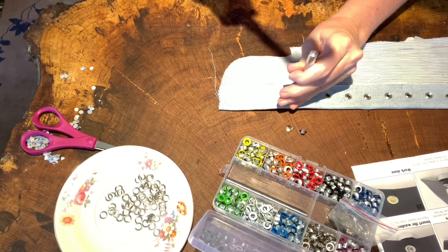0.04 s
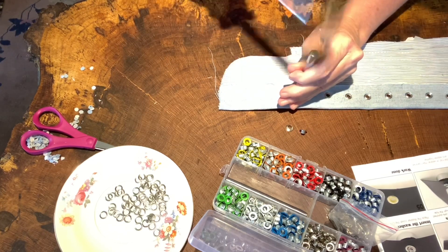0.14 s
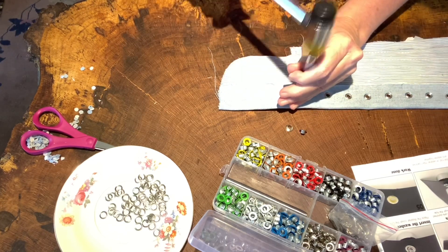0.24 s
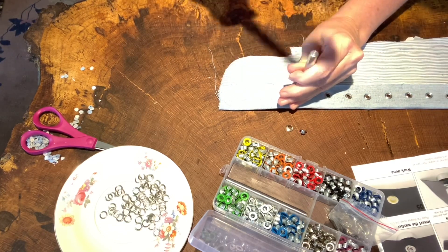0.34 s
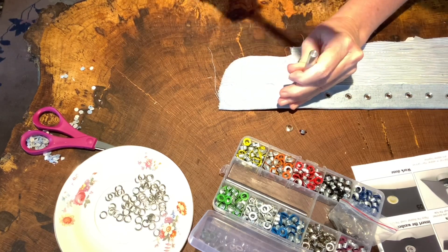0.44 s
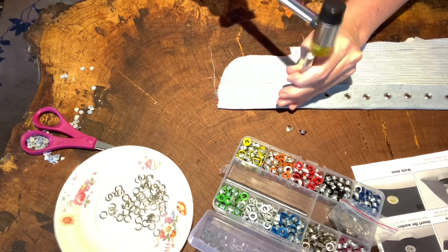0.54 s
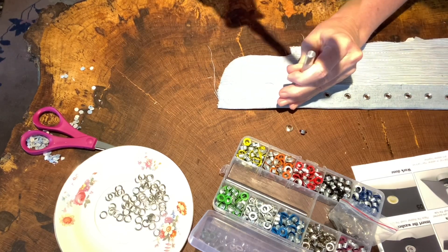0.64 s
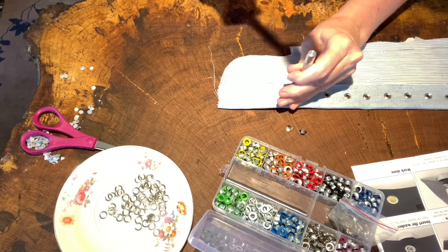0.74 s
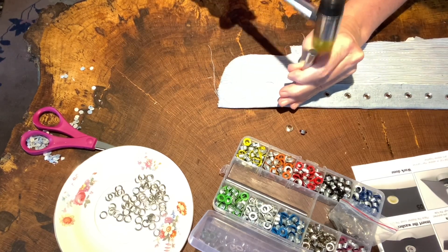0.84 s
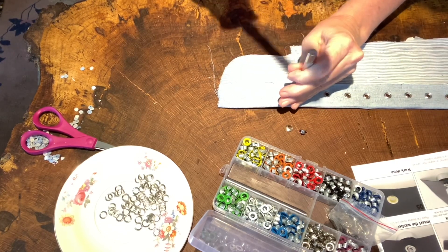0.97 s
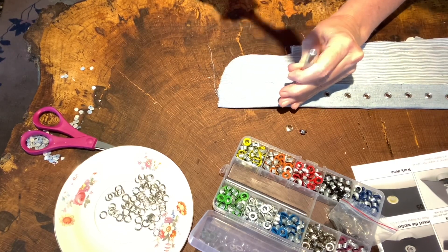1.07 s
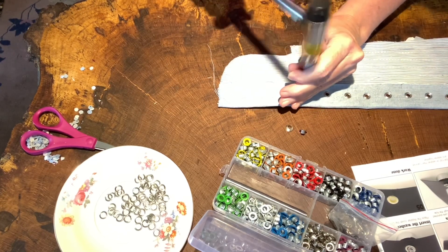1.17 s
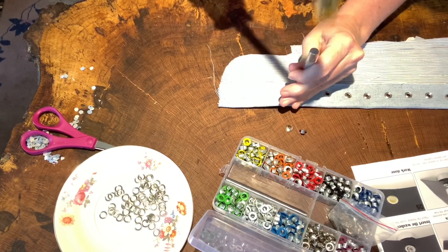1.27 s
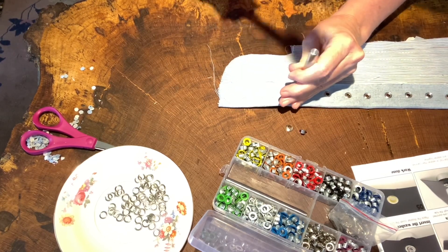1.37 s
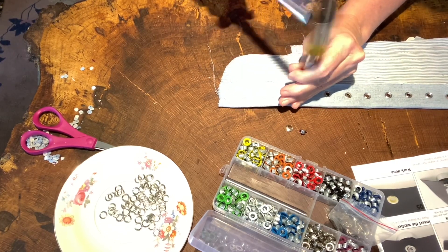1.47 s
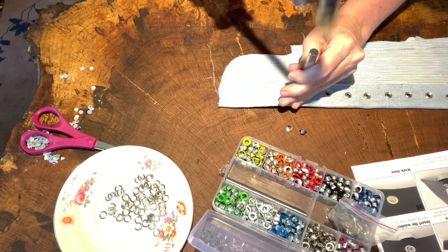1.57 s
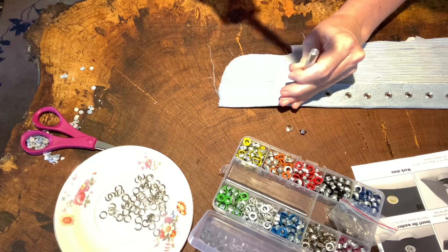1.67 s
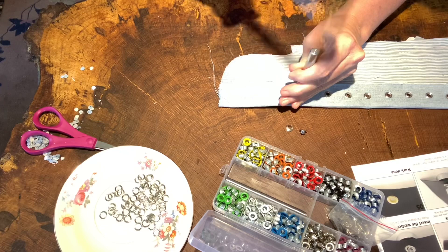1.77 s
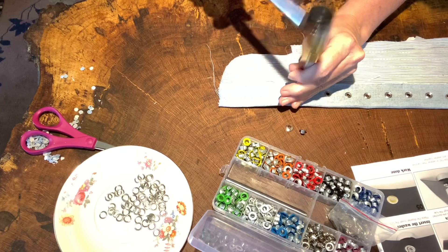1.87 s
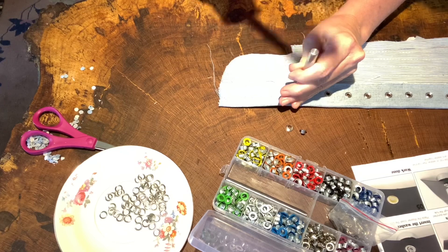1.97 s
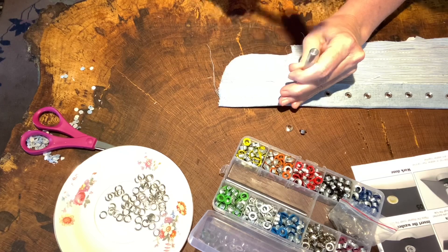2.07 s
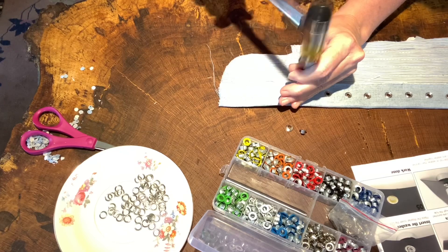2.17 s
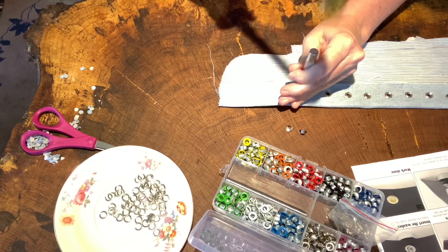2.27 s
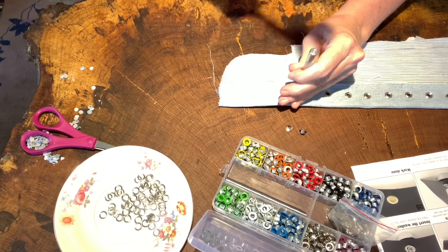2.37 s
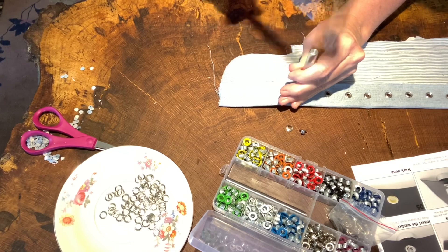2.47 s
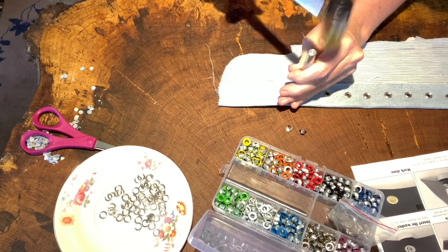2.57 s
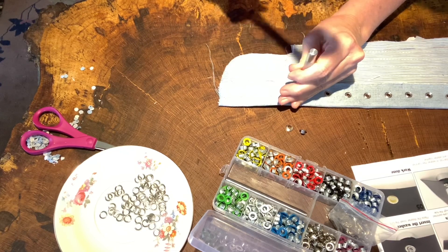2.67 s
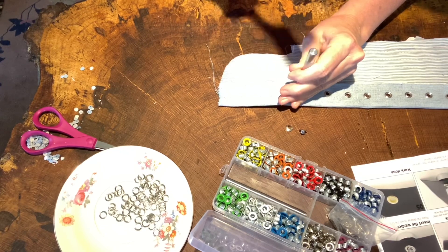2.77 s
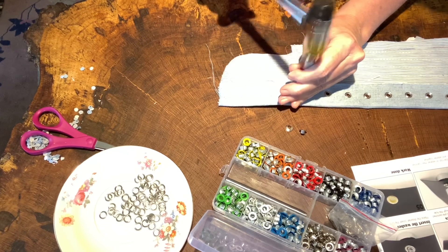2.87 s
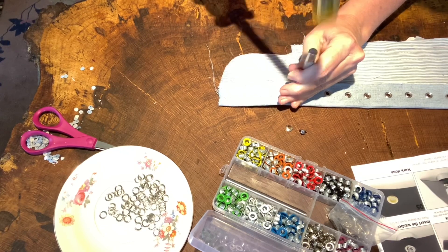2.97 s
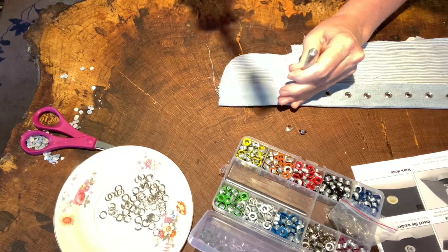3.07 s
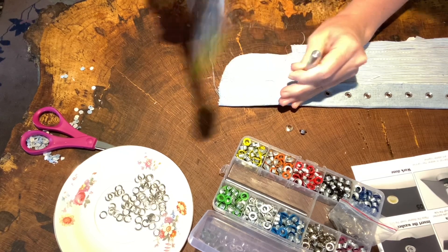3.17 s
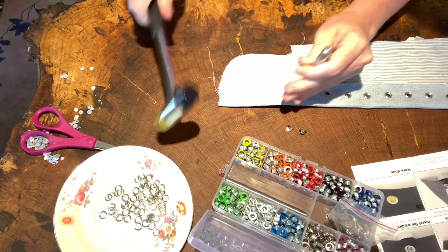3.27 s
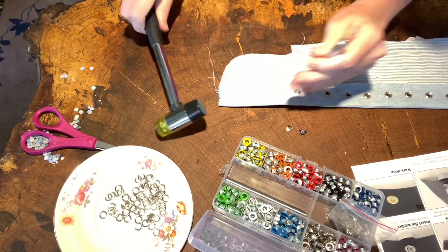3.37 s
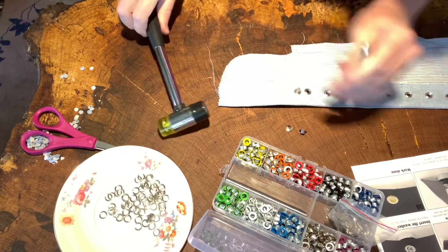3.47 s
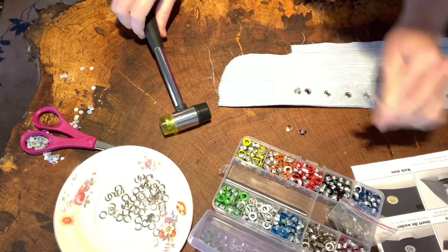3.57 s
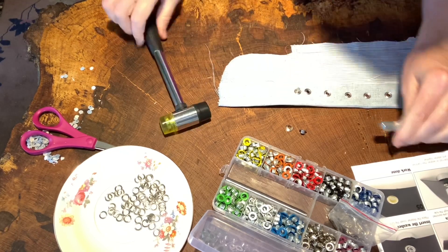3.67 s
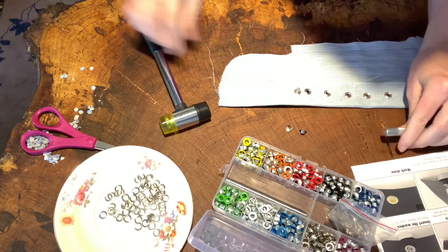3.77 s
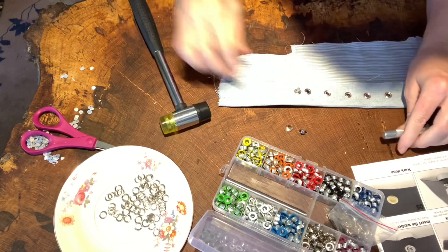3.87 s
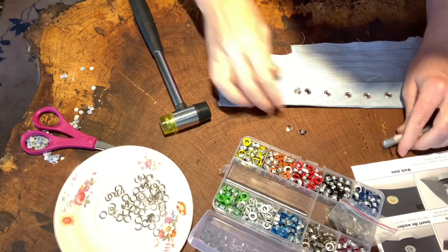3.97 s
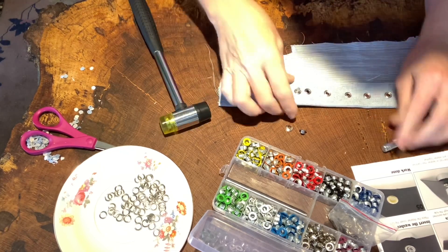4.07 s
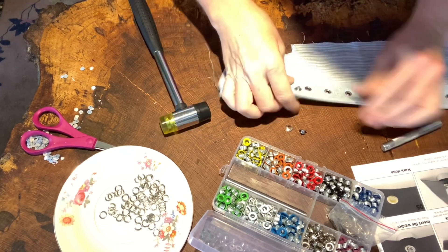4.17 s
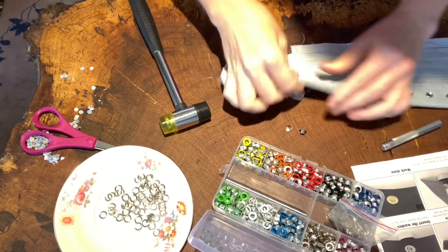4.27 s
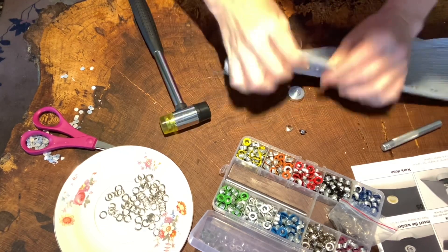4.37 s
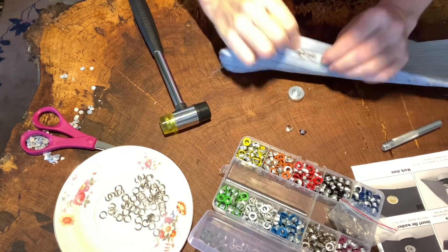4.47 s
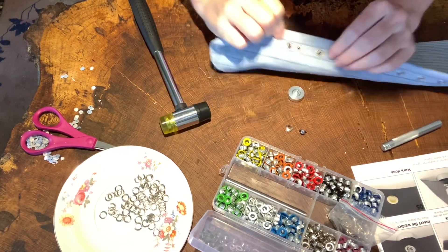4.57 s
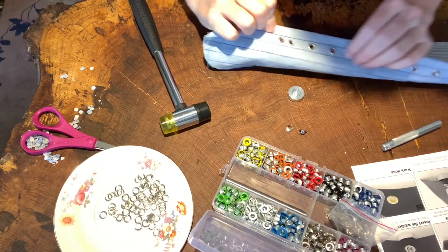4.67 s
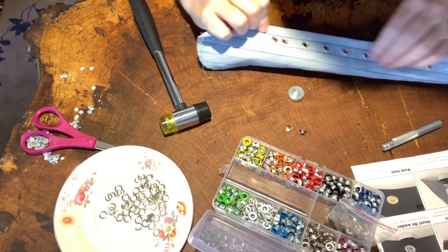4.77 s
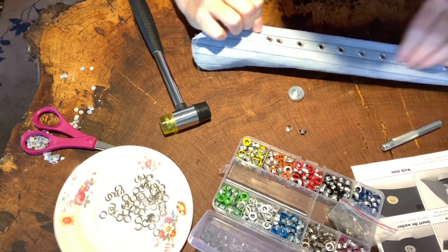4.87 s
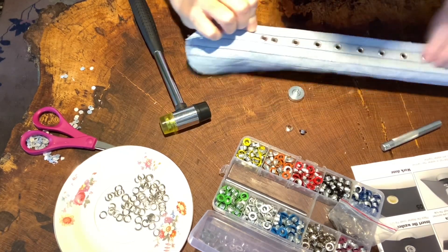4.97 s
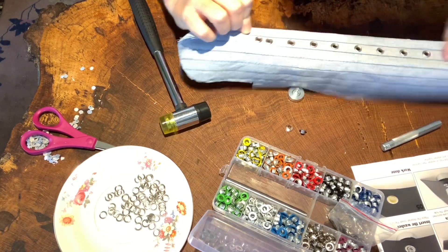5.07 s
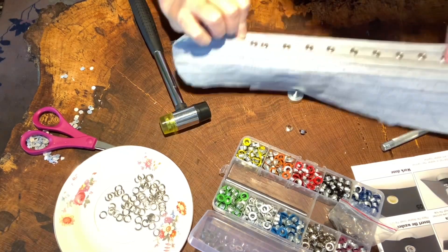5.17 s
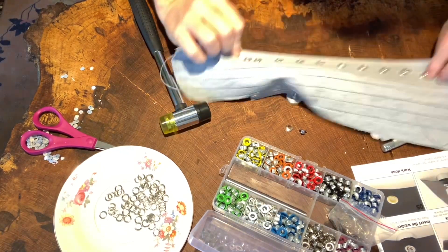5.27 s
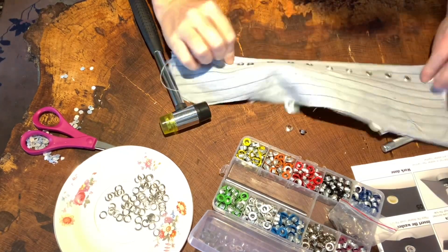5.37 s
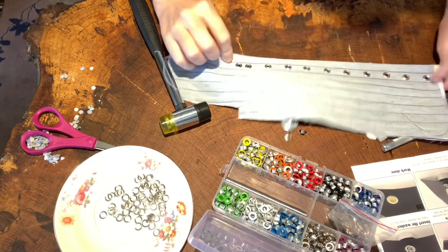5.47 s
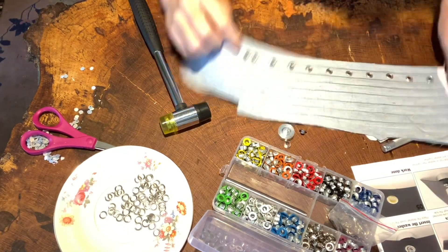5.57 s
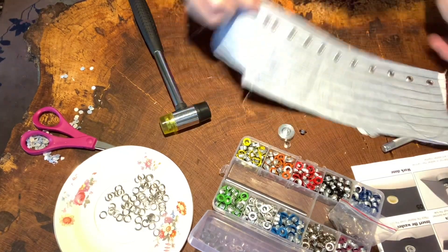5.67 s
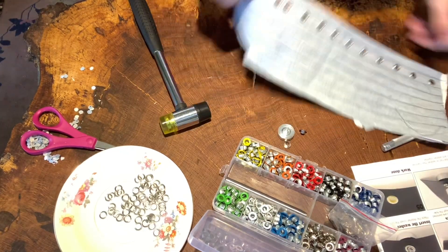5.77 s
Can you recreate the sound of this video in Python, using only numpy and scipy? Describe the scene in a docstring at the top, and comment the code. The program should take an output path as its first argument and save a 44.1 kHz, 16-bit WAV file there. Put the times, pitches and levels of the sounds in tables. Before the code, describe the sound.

A small mallet strikes a steel eyelet punch nine times on a wooden table, then tools are set down with knocks and a clink.

```python
"""A mallet drives a steel eyelet punch nine times through cloth into a thick wooden table.
Small live room, one microphone, near enough to hear each knock ahead of the room's answer.
The punch scrapes out of the eyelet and touches the wood; the mallet is laid down, head then handle.
The punch drops and rings on its bending modes, the little anvil clicks free, and the cloth strip
is lifted away with a faint rustle. A quiet room hum lies under it all."""
import sys
import numpy as np
from scipy import signal
from scipy.fft import rfft, irfft, next_fast_len
from scipy.io import wavfile

SR = 44100
rng = np.random.default_rng(int(sys.argv[2]) if len(sys.argv) > 2 else 0)


def digitize_waveform(pressure):
    """Quantize a signal to 16-bit integers and store it at the path in sys.argv[1].

    Rows of a 2-D input are taken as channels; values are limited to [-1, 1].
    """
    field = np.atleast_2d(pressure).T
    bounded = np.clip(field, -1, 1)
    quanta = np.round(bounded * 32767).astype(np.int16)
    wavfile.write(sys.argv[1], SR, quanta)


N = 257103
SPAN = 32768  # samples in one impact and its tail
T = np.arange(SPAN) / SR
HZ = np.fft.rfftfreq(SPAN, 1 / SR)

# room tone: freq_hz, level_db
ROOM_TONE = [(25, -17.5), (50, -8), (90, -8.5), (150, 2.5), (230, -9.5), (550, -10.5), (1000, -14.5),
             (2100, -19), (5400, -23), (7000, -22), (14400, -30), (16000, -26.5)]
# decay of the room: freq_hz, t60_s
ROOM_DECAY = [(100, 0.83), (300, .42), (550, 0.28), (1000, .31), (3000, 0.27), (7500, .255), (14000, .21)]
# mallet blows: start_s, level_db, slant_db, chink_db, edge_db
BLOWS = [(0.1185, -1.5, -4, 3, 3.5), (0.4574, 0, -5, -0.5, -1.5), (0.782, 0, 2.5, -4.5, -2.5),
         (1.1195, -0.5, 1.5, 1.5, 2.5), (1.436, 0.5, -4.5, 0.5, -1.5), (1.7597, -0.5, -4, -3, 3.5),
         (2.1057, 0.5, -4, 3, 1), (2.458, 0, -1, -2.5, -1.5), (2.8132, -1, -0.5, 3.5, 7)]
# a blow's knock, straight to the microphone: freq_hz, level_db
KNOCK_SPECTRUM = [(25, 0), (130, 11), (450, 24), (900, 25.5), (1250, 26.5), (1800, 17.5), (2400, 14),
                  (3000, 18), (4400, 8), (7200, 12), (10000, 2), (15000, 2)]
# low modes of table and room: pitch_hz, level_db, t60_s
BOOM_MODES = [(45.1, -35.5, 0.33), (61.2, -40.0, 0.36), (96.9, -34.0, 0.49), (130.5, -23.0, 0.31),
              (185.7, -21.0, 0.34), (199.9, -20.0, 0.35), (253.7, -24.0, 0.46), (277.2, -25.0, 0.34),
              (356.0, -23.5, 0.31), (370.8, -24.0, 0.28), (440.1, -22.0, 0.2), (459.6, -19.5, 0.24),
              (500.0, -18.5, 0.32), (528.9, -24.0, 0.3), (551.8, -20.0, 0.27), (624.5, -19.0, 0.28),
              (649.4, -22.5, 0.25), (736.8, -18.5, 0.23), (765.1, -25.0, 0.24), (788.0, -19.5, 0.25),
              (845.0, -25.5, 0.24), (872.0, -22.0, 0.21), (1026.9, -29.0, 0.26), (1066.6, -30.0, 0.25),
              (1139.9, -24.5, 0.26), (1163.5, -25.0, 0.25), (1255.7, -26.0, 0.22), (1291.3, -30.0, 0.24),
              (1319.6, -24.5, 0.19), (1416.5, -24.5, 0.19)]
# the room's diffuse answer to a blow: freq_hz, level_db
WASH_SPECTRUM = [(25, -17), (100, 13), (300, 25), (650, 25.5), (900, 19), (1100, 18), (1500, 20),
                 (1850, 16), (2100, 14.5), (2500, 11), (3200, 13.5), (4400, 7.5), (6000, 10.5), (7400, 12),
                 (10000, 3), (15000, -2.5)]
# a slanting blow shifts weight between the punch's resonances: freq_hz, slant_share
SLANT_SHARES = [(1500, 0), (2050, 1), (3100, -.8), (4100, .9), (6000, 0)]
# steel scraping in the eyelet: freq_hz, level_db
SCRAPE_SPECTRUM = [(200, -20), (2500, -6), (4000, 0), (5200, -1), (6400, 6), (8000, -12), (11000, -24),
                   (16000, -32.5)]
# the punch meets the table: start_s, clack_db, ring_db
PUNCH_DROPS = [(3.2135, -25.5, -48), (3.965, -13, -21), (3.9881, 2, 0), (4.041, -2.5, -45.5),
               (4.076, -13.5, -50)]
# its clack on the wood: freq_hz, level_db
CLACK_SPECTRUM = [(30, -30.5), (200, 3), (500, 5.5), (1000, 2), (1400, 4.5), (1750, 2), (2380, 5.5),
                  (2900, -2.5), (3850, 2.5), (4500, -2), (5150, -2), (8300, -11), (11000, -17.5),
                  (15000, -28)]
# its bending modes: pitch_hz, level_db, t60_s
PUNCH_MODES = [(6341, -13, .4), (2363, -35, .24), (3833, -40, .25), (5152, -43, .25)]
# the mallet head touches the table: start_s, level_db, tilt_db_per_octave
HEAD_TAPS = [(3.389, -21.5, -5.5), (3.5335, -1.5, -1.5)]
# the head's knock: freq_hz, level_db
HEAD_SPECTRUM = [(30, -37), (200, -0.5), (450, 0), (610, 11.5), (730, -1), (870, 9), (1080, -2), (1340, 8),
                 (1650, -7.5), (2300, -0.5), (4000, -9), (8000, -17), (15000, -25.5)]
# the handle lands and bounces: start_s, level_db, tilt_db_per_octave
HANDLE_TAPS = [(3.651, 3, -2.5), (3.6955, -3, -3.5), (3.7225, -12, -7)]
# the handle's knock: freq_hz, level_db
HANDLE_SPECTRUM = [(30, -15.5), (200, -2.5), (330, -1.5), (430, 10.5), (560, 6), (850, -11), (1160, 2.5),
                   (1900, -8.5), (2400, -6), (3100, -6.5), (4200, -5), (8000, -20.5), (15000, -31.5)]
# anvil and eyelets click: start_s, level_db, tilt_db_per_octave
ANVIL_CLICKS = [(4.2452, 6, -4.5), (4.281, 7, -2.5), (4.303, -12, 2), (5.419, -37.5, 10),
                (5.4665, -28.5, 6.5), (5.545, -20, -9)]
# one such click: freq_hz, level_db
CLICK_SPECTRUM = [(30, -53), (200, -25.5), (800, -21), (1300, -12.5), (2000, -16.5), (3000, -11.5),
                  (4800, -22.5), (7500, -15), (11000, -26), (15000, -29)]
# cloth slides under the fingers: start_s, length_s, level_db
CLOTH_SLIDES = [(4.42, 0.58, -70.5), (5.22, 0.22, -69.5)]
# its rustle: freq_hz, level_db
RUSTLE_SPECTRUM = [(290, -40.5), (500, -16), (868, -8), (1030, -23), (1320, -13), (12900, 3), (16000, -0.5)]
# the lifted strip flaps against the table: start_s, level_db
CLOTH_FLAPS = [(5.035, -70), (5.175, -62.5), (5.53, -65.5), (5.77, -73)]
# one flap: freq_hz, level_db
FLAP_SPECTRUM = [(100, -10.5), (350, -5), (600, 5), (1500, -15), (3000, -26), (16000, -37)]


def amp(db):
    """Decibels to gain."""
    return 10 ** (np.asarray(db) / 20)


def along(points, hz):
    """Read (freq_hz, value) points on a log frequency axis."""
    freqs, values = np.transpose(points)
    return np.interp(np.log(hz + 1), np.log(freqs + 1), values)


def add(track, start_s, sound):
    """Mix a sound into the track."""
    part = track[round(start_s * SR):][:len(sound)]
    part += sound[:len(part)]


def causal(db):
    """Minimum-phase response with these levels: it starts at once and dies away."""
    cepstrum = irfft(db * np.log(10) / 20)
    cepstrum[1:SPAN // 2] *= 2
    cepstrum[SPAN // 2 + 1:] = 0
    return np.exp(rfft(cepstrum))


def waveform(response):
    """The waveform of a frequency response, faded to silence."""
    return irfft(response) * np.clip(8 - 10 * T / T[-1], 0, 1)


def noise(spectrum):
    """Coloured noise of rms 1."""
    gain = amp(along(spectrum, np.fft.rfftfreq(N, 1 / SR)))
    coloured = irfft(rfft(rng.standard_normal(N)) * gain, N)
    return coloured / np.std(coloured)


def room_tone():
    """The steady, quiet hum of the room."""
    return amp(-63) * noise(ROOM_TONE)


def bending(lag_s):
    """Bending waves in wood: treble arrives first; lag_s is the delay at 1 kHz."""
    return np.exp(-4j * np.pi * lag_s * np.sqrt(HZ * 1000))


def rattle(t60_s, from_hz):
    """Above from_hz a contact is no clean pulse: many short modes ring, new ones each time."""
    burst = rng.standard_normal(SPAN) * amp(-60 * T / t60_s)
    blend = np.arctan((HZ / from_hz) ** 2)
    return np.cos(blend) + np.sin(blend) * rfft(burst / np.linalg.norm(burst))


def ring(modes, attack_s):
    """Damped sines that swell in; neighbouring modes swing in opposite senses."""
    sines = [(-1) ** k * amp(db - 60 * T / t60_s) * np.sin(2 * np.pi * hz * T)
             for k, (hz, db, t60_s) in enumerate(modes)]
    return sum(sines) * (1 - np.exp(-T / attack_s))


def room(build_s=.007, gap_s=.0026):
    """The room at the microphone: reflections thicken, then each band dies at its own speed."""
    hz, t, bands = signal.stft(rng.standard_normal(SPAN), SR, nperseg=256)
    swell = 1 - np.exp(-np.maximum(t - gap_s, 0) / build_s)
    fade = swell * amp(-60 * t / along(ROOM_DECAY, hz)[:, None])
    fade /= np.sqrt(np.mean(fade ** 2, axis=1, keepdims=True) * SPAN)  # unit power
    tail = signal.istft(bands * fade, SR, nperseg=256)[1][:SPAN]
    return rfft(tail * (T > gap_s))


def mallet_blows(rim_delay_s=.0024, rim_cutoff_hz=3600, renew_hz=4000):
    """Every blow lands on one spot: wood and room answer much alike while the steel contact varies."""
    # the wave comes back duller from the table's rim
    rim_echo = .9 * np.exp(-2j * np.pi * HZ * rim_delay_s) / (1 + (HZ / rim_cutoff_hz) ** 2)
    knock = causal(along(KNOCK_SPECTRUM, HZ)) * bending(lag_s=.0013) * (1 + rim_echo)
    boom = rfft(ring(BOOM_MODES, attack_s=.017))
    wash, walls = causal(along(WASH_SPECTRUM, HZ)), room()
    renewal = np.arctan(HZ / renew_hz)  # short waves feel the small shifts of hand and tool
    chink_band = along([(4500, 0), (6500, .99), (8500, 1), (10500, 0)], HZ)
    edge_band = along([(8500, .3), (10500, 1)], HZ)
    out = np.zeros(N)
    for start_s, db, slant_db, chink_db, edge_db in BLOWS:
        steel_db = slant_db * along(SLANT_SHARES, HZ) + chink_db * chink_band + edge_db * edge_band
        direct = knock * rattle(t60_s=.012, from_hz=3500)
        reflections = wash * (np.cos(renewal) * walls + np.sin(renewal) * room())
        add(out, start_s, waveform(causal(db + steel_db) * (direct + boom + reflections)))
    return out


def strokes(rows, attack_s, t60_s):
    """Envelope of (start_s, length_s, level_db) strokes: each swells, holds and dies away."""
    t = np.arange(N) / SR
    envelope = np.zeros(N)
    for start_s, length_s, db in rows:
        swell = np.clip((t - start_s) / attack_s, 0, 1)
        envelope += swell * amp(db - 60 * np.maximum(t - start_s - length_s, 0) / t60_s)
    return envelope


def punch_scrape(start_s=3.162, length_s=.048, level_db=-61):
    """Steel rubs out of the eyelet in one short stroke."""
    return strokes([(start_s, length_s, level_db)], attack_s=.009, t60_s=.12) * noise(SCRAPE_SPECTRUM)


def contacts(rows, spectrum, t60_s, room_db):
    """Light knocks on the table, each a short coloured rattle with the room behind it."""
    out = np.zeros(N)
    octaves = np.log2(np.maximum(HZ, 200) / 1500)
    for start_s, db, tilt in rows:
        colour = causal(along(spectrum, HZ) + db + tilt * octaves)
        direct = bending(lag_s=.0012) * rattle(t60_s, from_hz=460)
        add(out, start_s, waveform(colour * (direct + amp(room_db) * room())))
    return out


def punch_drops(split_hz=6.8, settle_s=.11, damping_db_per_s=110):
    """The dropped punch clacks on the wood and sings on its bending modes."""
    clacks = [(start_s, db, 0) for start_s, db, _ in PUNCH_DROPS]
    out = contacts(clacks, CLACK_SPECTRUM, t60_s=.032, room_db=-1.5)
    note = ring(PUNCH_MODES, attack_s=.00029)
    # the rod bends in two planes, split_hz either side of each pitch, so the note beats
    note *= np.cos(2 * np.pi * split_hz * (T - .0045))
    note *= amp(-damping_db_per_s * np.maximum(T - settle_s, 0))  # then a hand closes on it and damps it
    for start_s, _, ring_db in PUNCH_DROPS:
        add(out, start_s, amp(ring_db) * note)
    return out


def mallet_laid_down():
    """The head knocks on the table, then the handle lands and bounces."""
    head = contacts(HEAD_TAPS, HEAD_SPECTRUM, t60_s=.013, room_db=-4.5)
    handle = contacts(HANDLE_TAPS, HANDLE_SPECTRUM, t60_s=.0164, room_db=-8)
    return head + handle


def anvil_clicks():
    """The anvil comes free and the eyelets tick: small, bright contacts."""
    return contacts(ANVIL_CLICKS, CLICK_SPECTRUM, t60_s=.042, room_db=-4)


def cloth_lifted(flap_length_s=.0207):
    """The strip rubs under the fingers and flaps softly against the table."""
    slides = strokes(CLOTH_SLIDES, attack_s=.091, t60_s=.6)
    flap_rows = [(start_s, flap_length_s, db) for start_s, db in CLOTH_FLAPS]
    flaps = strokes(flap_rows, attack_s=.013, t60_s=.12)
    return slides * noise(RUSTLE_SPECTRUM) + flaps * noise(FLAP_SPECTRUM)


def scene():
    """The work at the table over the room tone, all at one microphone."""
    tools = mallet_laid_down() + anvil_clicks() + mallet_blows() + punch_drops() + punch_scrape()
    return (tools + cloth_lifted() + room_tone())[None]


def record(dry, low_cut_hz=37, ceiling=.92, top_hz=16100):
    """The recorder sheds the deepest bass, rounds off the highest peaks and cuts the top treble."""
    trimmed = signal.sosfilt(signal.butter(4, low_cut_hz, "highpass", fs=SR, output="sos"), dry)
    rounded = trimmed / (1 + np.abs(trimmed / ceiling) ** 6) ** (1 / 6)
    size = next_fast_len(N + SPAN)
    passband = 1 / (1 + (np.fft.rfftfreq(size, 1 / SR) / top_hz) ** 120)
    return irfft(rfft(rounded, size) * passband, size)[:, :N]


dry = scene()
out = record(dry)
digitize_waveform(out)
```